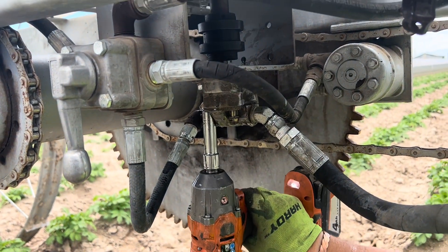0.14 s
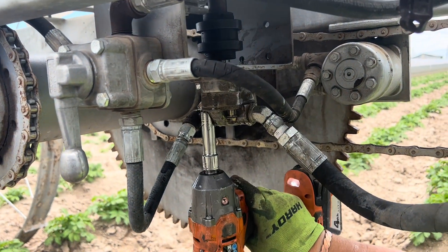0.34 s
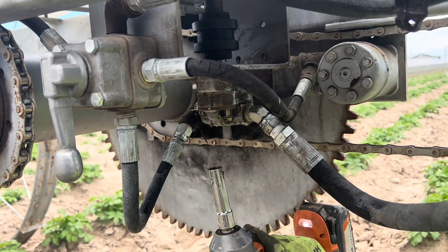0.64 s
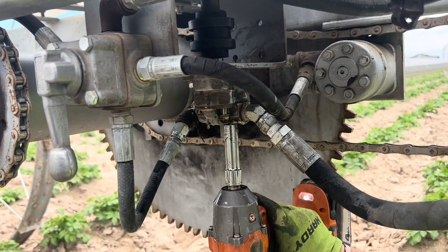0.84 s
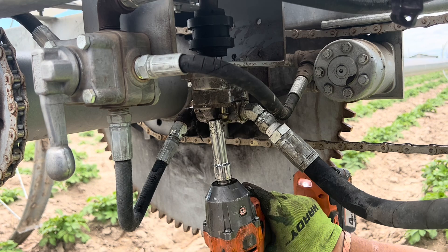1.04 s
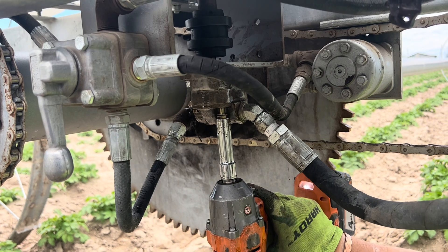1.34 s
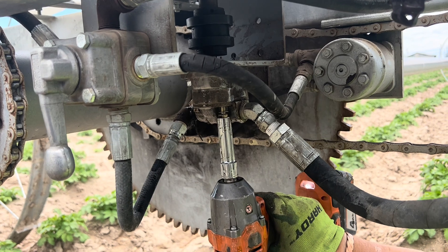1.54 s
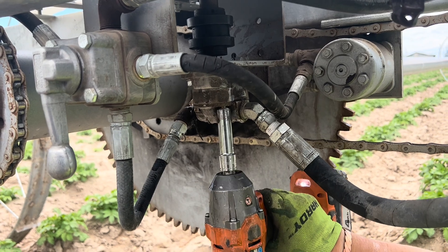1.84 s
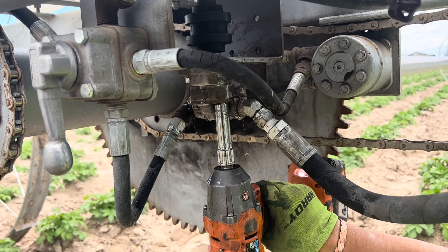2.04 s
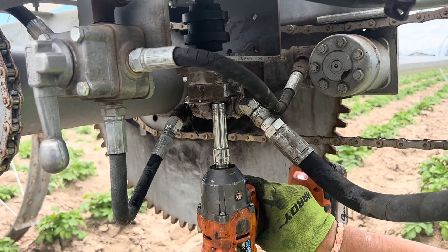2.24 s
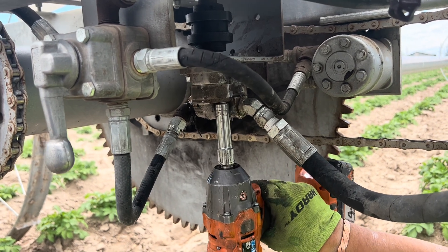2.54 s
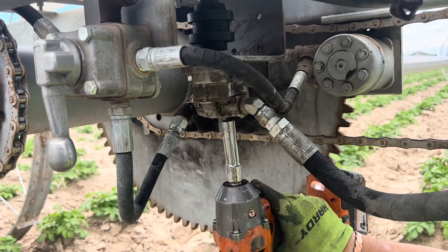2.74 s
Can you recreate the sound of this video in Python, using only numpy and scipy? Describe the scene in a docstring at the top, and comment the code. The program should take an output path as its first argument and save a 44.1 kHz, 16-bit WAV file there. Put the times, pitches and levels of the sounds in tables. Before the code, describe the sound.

A cordless impact wrench gives a short hard rattle, pauses while its socket clicks onto a bolt, then fires three more brief bursts with a rising motor whine; close microphone, open field, faint low rumble.

```python
"""A cordless impact wrench runs four short bursts on the bolts of a farm machine, close by in an open field.
Its motor is a whine with rough gear tones and noise, all following one speed; it slows under load and brakes.
Its hammer strikes the anvil in double blows, made of noisy thuds and cracks with damped rings.
Filtered noise clicks tick inside the tool, and between bursts the socket knocks onto a bolt head.
Noise also makes the soft bumps, the low rumble and the faint outdoor rush underneath."""
import sys
import numpy as np
from scipy import signal
from scipy.fft import rfft, irfft, next_fast_len
from scipy.io import wavfile
from scipy.ndimage import map_coordinates

SR = 44100
rng = np.random.default_rng(int(sys.argv[2]) if len(sys.argv) > 2 else 0)


def put_to_file(sound):
    """Save the sound as 16-bit audio at rate SR, in the file named by the first command-line argument."""
    columns = np.atleast_2d(sound).T  # one column per channel
    safe = np.clip(columns, -1, 1)
    whole_steps = np.round(safe * 32767)
    wavfile.write(sys.argv[1], SR, whole_steps.astype(np.int16))


N = 127890

# The four bursts of the wrench. Each row: motor starts in seconds, hammer bites in seconds,
# time in seconds from which the speed decays, which may lie before the start.
RUNS = [(0.066, .117, 0.41), (1.486, 1.535, 1.4), (1.823, 2.173, 2.255), (2.384, 2.449, 2.54)]


def amp(db):
    """Decibels to gain."""
    return 10 ** (np.asarray(db) / 20)


def rms(x):
    """Root mean square level."""
    return np.sqrt(np.mean(x ** 2))


def unit(x):
    """Scaled to rms 1."""
    return x / np.sqrt(np.mean(x ** 2) + 1e-20)


def along(points, hz):
    """A curve of (Hz, value) points read on a log frequency axis."""
    f, v = np.transpose(points)
    return np.interp(np.log(hz + 1), np.log(f + 1), v)


def level(rows):
    """Gain per sample from (s, dB) points, all but silent outside them."""
    s, db = np.transpose(rows)
    return amp(np.interp(np.arange(N) / SR, s, db, left=-120, right=-120))


def wobble(rate):
    """A smooth random curve with rate knots a second."""
    knots = rng.standard_normal(int(N * rate / SR) + 4)
    return map_coordinates(knots, [np.arange(N) * rate / SR])


def filtered(x, response):
    """x shaped by a response given as a function of frequency."""
    n = x.shape[-1]
    m = next_fast_len(n + 8192)
    hz = np.fft.rfftfreq(m, 1 / SR)
    return irfft(rfft(x, m) * response(hz), m)[..., :n]


def noise(spectrum, size):
    """Coloured noise of rms 1."""
    return unit(filtered(rng.standard_normal(size), lambda hz: amp(along(spectrum, hz))))


def band(centre_hz, width_hz, size):
    """Noise of rms 1 in one resonance."""
    return unit(filtered(rng.standard_normal(size),
                         lambda hz: 1 / (1 + ((hz - centre_hz) / width_hz) ** 2)))


def fade(t, t60):
    """Quick rise and exponential decay of a contact."""
    rise_s = 0.0005
    return (1 - np.exp(-t / rise_s)) * amp(-60 * t / t60)


def burst(spectrum, t, t60):
    """A short noisy contact of set energy, coloured a little differently each time."""
    colour_scatter = 0.086  # relative shift of the spectrum from contact to contact
    shape = fade(t, t60)
    shift = np.exp(colour_scatter * rng.standard_normal())
    shifted = [(hz * shift, db) for hz, db in spectrum]
    return unit(noise(shifted, size=len(t)) * shape) * rms(shape)


def ring(modes, t):
    """Damped modes, struck a little differently each time."""
    scatter_db = 2.5
    out = np.zeros(len(t))
    for hz, db, t60 in modes:
        gain = amp(db + rng.normal(0, scatter_db))
        out += gain * np.sin(2 * np.pi * (hz * t + rng.random())) * fade(t, t60)
    return out


def add(track, s, sound):
    """Mixes a sound in at s seconds."""
    part = track[max(round(s * SR), 0):][:len(sound)]
    part += sound[:len(part)]


def air(air_db=-69):
    """A faint, steady outdoor rush of coloured noise."""
    # Colour of the rush. Each row: frequency in Hz, relative level in dB per Hz.
    air_spectrum = [(100, -9), (850, 14), (2000, 4.5), (2900, -15), (4700, -4), (6300, -15), (15000, -28)]
    return amp(air_db) * noise(air_spectrum, size=N)


def rumble(gust_db=2.25, relative_width=0.46):
    """Low rumble of breeze and handling swells irregularly, with a few soft bumps and rubs."""
    # Course of the rumble, before the gusts. Each row: time in seconds, level in dB.
    rumble_level = [(0, -45), (.45, -43.5), (.62, -50.5), (1.15, -41), (1.42, -59), (1.9, -50), (2.3, -41),
                    (2.9, -44.5)]
    # Colour of the rumble. Each row: frequency in Hz, relative level in dB per Hz.
    rumble_spectrum = [(20, -18), (60, 7), (250, -6.5), (400, -16), (2000, -76)]
    # Bumps and rubs of handling. Each row: middle in seconds, 1/e half-length in seconds,
    # level in dB, centre in Hz.
    bumps = [(0.996, 0.017, -31.5, 80), (1.051, 0.027, -32.5, 180), (1.603, .02, -35, 75),
             (1.699, 0.024, -39, 950), (1.777, 0.021, -32, 220), (2.014, .02, -27, 120),
             (2.587, 0.009, -28.5, 70)]
    t = np.arange(N) / SR
    swell_db = np.interp(t, *np.transpose(rumble_level)) + gust_db * wobble(24)
    out = amp(swell_db) * noise(rumble_spectrum, size=N)
    for s, length, db, hz in bumps:
        shape = np.exp(-((t - s) / length) ** 2)
        out += amp(db) * unit(shape * band(hz, relative_width * hz, size=N)) * rms(shape)
    return out


def knocks(knock_t60=0.015, bolt_db=-19.5, bolt_q=45, scrape_db=-15, scrape_t60=0.18):
    """The socket clicks dryly on the bolt head; the bolt rings roughly as it scrapes into place."""
    # Contacts of socket and bolt. Each row: start in seconds, level in dB, centre of the click in Hz.
    contacts = [(0.8828, -19, 2790), (0.948, -41.5, 3300), (0.97, -46, 7800), (0.991, -34, 1960),
                (1.138, -40.5, 5900), (1.171, -35, 3500), (1.2, -42, 7100), (1.234, -36.5, 2700)]
    # Ring of the bolt and its bracket. Each row: frequency in Hz, relative level in dB, T60 in seconds.
    bolt_modes = [(942, 1, 0.2), (1220, -1, 0.2), (1870, 3, 0.1), (3300, -5.5, .07)]
    t, out = np.arange(SR // 3) / SR, np.zeros(N)
    for s, db, hz in contacts:
        click = band(hz, hz / 2, size=len(t)) * fade(t, knock_t60)
        bolt = np.zeros(len(t))
        for mode_hz, mode_db, t60 in bolt_modes:
            bolt += amp(mode_db) * band(mode_hz, mode_hz / bolt_q, size=len(t)) * fade(t, t60)
        scrape = band(hz / 2, hz, size=len(t)) * fade(t, scrape_t60)
        add(out, s, amp(db) * (click + amp(bolt_db) * bolt + amp(scrape_db) * scrape))
    return out


def ticks(t60=0.02, tick_db=2):
    """Light noise clicks of the trigger and of the gears running down."""
    # Clicks. Each row: start in seconds, level in dB relative to tick_db.
    clicks = [(.2665, -27.5), (1.5128, -36), (1.6423, -24.5), (1.8145, -23.5), (2.2746, -25.5),
              (2.2931, -25.5), (2.3936, -21.5), (2.6403, -26.5), (2.655, -24), (2.6707, -25),
              (2.6883, -24.5), (2.7059, -29), (2.7436, -38.5)]
    # Colour of a click. Each row: frequency in Hz, relative level in dB per Hz.
    tick_spectrum = [(200, -5), (1000, -8.5), (4000, 3.5), (6000, -7.5), (8500, 3), (15500, -16)]
    t, out = np.arange(SR // 10) / SR, np.zeros(N)
    for s, db in clicks:
        add(out, s, amp(db + tick_db) * burst(tick_spectrum, t, t60))
    return out


def hammer(thud_db=4.0, crack_db=6.0):
    """Each blow is a short thud and a steel crack that shake and ring the case, thump the tool and ping the socket."""
    # Hammer blows. Each row: start in seconds, thud in dB relative to thud_db,
    # crack in dB relative to crack_db.
    blows = [(0.1161, -11, -11), (0.1283, -8, -21), (0.1348, -17, -17), (.137, -19.5, -13.5),
             (0.156, -13, -27), (0.1617, -5.5, -18), (.168, -17, -11.5), (.193, -10, -16),
             (0.1997, -19, -11), (.2176, -14.5, -29), (0.2225, -6.5, -16.5), (0.231, -20, -9.5),
             (1.527, -23, -22), (1.5352, -11, -14), (1.5374, -14, -10), (1.5516, -23.5, -18.5),
             (1.566, -21.5, -21), (1.5803, -31.5, -27.5), (1.5939, -14, -8), (1.6112, -30.5, -23.5),
             (1.626, -20, -13), (2.1667, -12.5, -14), (2.1731, -17, -11), (2.1782, -22, -11.5),
             (2.204, -8, -17), (2.2093, -15, -11.5), (2.233, -18, -27.5), (2.2407, -8.5, -16),
             (2.2492, -18.5, -11), (2.45, -20, -13.5), (2.4689, -12.5, -27), (2.474, -11, -7),
             (2.4812, -20, -11.5), (2.5051, -15, -11), (2.512, -17, -12.5), (2.5372, -18, -11.5),
             (2.5422, -14.5, -10), (2.566, -19, -10.5), (2.573, -18, -11), (2.6023, -24.5, -21),
             (2.616, -16.5, -9)]
    # Colours of thud and crack. Each row: frequency in Hz, relative level in dB per Hz.
    thud_spectrum = [(100, -17), (220, -7.5), (600, -15), (1100, 9), (1650, 7), (2600, 3.5), (4000, -9),
                     (15000, -34.5)]
    crack_spectrum = [(1000, -19.5), (4000, 7.5), (6000, 0.5), (8500, 6), (13000, -3.5), (15500, -15.5)]
    # Ring of the hammer case. Each row: frequency in Hz, relative level in dB.
    case_modes = [(1050, -1), (1590, -8), (1785, 6.5), (1875, 3), (3130, -7.5), (3880, 0.5), (6875, -3)]
    # Low thump of the whole tool. Each row: frequency in Hz, level over the thud in dB, T60 in seconds.
    thump = [(214.9, -21.5, 0.13)]
    # Ring of the socket, which sits loose in the second run. Each entry: level over the crack
    # in dB, one per run.
    socket_db = [-29.5, -11, -27.5, -28]
    thud_t60, crack_t60 = 0.01, 0.01
    case_db, case_t60 = -24, .07
    socket_hz, socket_width_hz, socket_t60 = 12660, 250, .028
    shudder_db, shudder_t60 = -18.5, .04  # the tool goes on shaking after each blow
    t, out = np.arange(SR // 5) / SR, np.zeros(N)

    def strike(spectrum, t60):
        """A contact and the weaker, longer shaking after it."""
        return burst(spectrum, t, t60) + amp(shudder_db) * burst(spectrum, t, shudder_t60)

    for s, thud, crack in blows:
        run = sum(s > start for start, _, _ in RUNS) - 1
        case = ring([(hz, db, case_t60) for hz, db in case_modes], t)
        body = strike(thud_spectrum, thud_t60) + amp(case_db) * case + ring(thump, t)
        ping = band(socket_hz, socket_width_hz, size=len(t)) * fade(t, socket_t60)
        steel = strike(crack_spectrum, crack_t60) + amp(socket_db[run]) * ping
        add(out, s, amp(thud + thud_db) * body + amp(crack + crack_db) * steel)
    return out


def motor(free_db=-2, loaded_db=0, whine_db=0.5, choke_db=-10, throb_db=4.5, surge_db=6, surge_s=0.047,
          surge_hz=2700, surge_width_hz=400, grain_db=3.0, waver_db=1.75):
    """The motor surges up and whines; as the hammer bites it sags, flutters and grinds, and its speed decays."""
    # Overall level of motor and gears, one curve per run. Each row: time in seconds, level in dB.
    drives = [
        [(.045, -64), (.075, -45), (.092, -34.5), (.116, -23), (.15, -24.5), (.24, -23.5), (.265, -31),
         (.29, -44.5), (.33, -59)],
        [(1.503, -60), (1.523, -45.5), (1.535, -24), (1.56, -28), (1.62, -35.5), (1.66, -38), (1.70, -61.5),
         (1.73, -69.5)],
        [(1.812, -55), (1.835, -44.5), (1.86, -28), (1.89, -26), (2.13, -25.5), (2.165, -21.5), (2.22, -25.5),
         (2.26, -26.5), (2.29, -36), (2.315, -45.5), (2.385, -64)],
        [(2.387, -49), (2.40, -45), (2.42, -28.5), (2.47, -25), (2.59, -23.5), (2.63, -25.5), (2.66, -39.5),
         (2.70, -46), (2.75, -62)],
    ]
    # Rough gear tones. Each row: multiple of the whine, level relative to the whine in dB before the throb.
    gear_tones = [(.333, -17), (.667, -15), (1.25, -13), (1.346, -7), (2, -21.5)]
    # Colours of the gear noise, free and loaded. Each row: frequency in Hz, relative level in dB per Hz.
    free_spectrum = [(100, -18.5), (300, -2.5), (550, -12), (1000, 6.5), (1500, -6.5), (4500, 5),
                     (5600, -1), (8500, 0), (10500, 1.5), (12000, -10), (15500, -19.5)]
    loaded_spectrum = [(100, -20.5), (210, 7.5), (300, -4), (550, 1.5), (1700, 2), (3900, 2), (5600, -2.5),
                       (7100, -2), (15500, -16.5)]
    top_speed_hz = 2960  # pitch of the main whine at full speed, without load
    spin_up_s, brake_s, bite_s = .031, 0.053, .03  # time constants of run-up, braking, coming load
    sag, flutter, load_flutter = .08, .002, 0.068  # relative slowing and unsteadiness; the last adds from the bite
    hammer_turns = 1 / 70  # hammer revolutions per whine cycle
    churn_db = 1  # swing of the gear noise in each revolution: half of this free, 1.5 times loaded
    t, out = np.arange(N) / SR, np.zeros(N)
    for (start, bite, slowing), drive in zip(RUNS, drives):
        age = np.maximum(t - start, 0)
        load = np.exp(np.minimum(t - bite, 0) / bite_s)  # rises to 1 at the bite and stays

        speed = top_speed_hz * (1 - np.exp(-age / spin_up_s)) * (1 - sag * load)
        speed = speed * np.exp(-np.maximum(t - slowing, 0) / brake_s)
        speed = speed * (1 + flutter * wobble(90) + load_flutter * (t > bite) * wobble(120))
        angle = 2 * np.pi * np.cumsum(speed) / SR
        turn = np.sin(hammer_turns * angle)

        # random phase drift roughens each gear tone
        mesh = sum(amp(db) * np.sin(k * angle + wobble(120)) for k, db in gear_tones)
        tones = np.sqrt(2) * (np.sin(angle) + amp(throb_db * turn) * mesh)
        whine = amp(whine_db + choke_db * load ** 10 + waver_db * wobble(80)) * tones
        whine = whine * speed / top_speed_hz * np.minimum(age / spin_up_s / 1.1, 1) ** 6

        gears = amp(free_db) * np.sqrt(1 - load) * noise(free_spectrum, size=N)
        gears += amp(loaded_db) * np.sqrt(load) * noise(loaded_spectrum, size=N)
        rattle = amp(churn_db * (-0.5 - load) * turn + grain_db * wobble(600))
        surge = amp(surge_db) * np.exp(-(age / surge_s) ** 2) * band(surge_hz, surge_width_hz, size=N)
        out += level(drive) * (gears * rattle + surge + whine)
    return out


def housing(x):
    """The many narrow resonances of the tool and the steel around it ripple its spectrum."""
    ripple_db, spacing_hz = 2.2, 70
    knots = rng.standard_normal(SR // spacing_hz)
    return filtered(x, lambda hz: amp(ripple_db * map_coordinates(knots, [hz / spacing_hz])))


def echo(x, t60s):
    """A diffuse noise tail, decaying at its own rate in each frequency and different at each port."""
    hz, t, z = signal.stft(rng.standard_normal((2, SR)), SR, nperseg=256)
    decay = amp(-60 * t / along(t60s, hz)[:, None])
    tail = signal.istft(z * decay, SR, nperseg=256)[1]
    return signal.fftconvolve(x[None], tail / np.linalg.norm(tail[0]), axes=1)[:, :N]


def spread(x, rate):
    """Two ports whose signals differ slightly from moment to moment."""
    side = amp(-15) * x * wobble(rate)
    return np.array([x + side, x - side])


def scene(field_db=-31):
    """The tool, its scattered echo in the open field, and the background."""
    # Scattered echo. Each row: frequency in Hz, T60 in seconds.
    field_t60 = [(200, .6), (1500, 1), (5000, 0.67), (12000, .25)]
    background = rumble() + air()
    tool = knocks() + ticks() + hammer() + housing(motor())
    near = spread(tool, 200) + spread(background, 40)
    return near + amp(field_db) * housing(echo(tool, field_t60))


def record(dry):
    """The two microphone ports differ in phase and level; nothing is kept above the band limit."""
    # Phase between the ports. Each row: frequency in Hz, lead of left over right in radians.
    port_phase = [(1900, 0.5), (3000, 0.74), (5600, 0.68), (7200, 0.95), (9700, -3), (12400, -5.5),
                  (13400, -8.5), (15500, -8.5)]
    # Balance of the ports. Each row: frequency in Hz, left over right in dB.
    port_balance = [(700, 0.5), (1050, 5), (1500, -2.5), (2700, 1.6), (9000, 0.5)]
    top_hz = 15900
    sides = np.array([[.5], [-.5]])  # each port takes half of the difference

    def port_response(hz):
        """Phase and gain of both ports."""
        return np.exp(1j * sides * along(port_phase, hz)) * amp(sides * along(port_balance, hz))

    ports = filtered(dry, port_response)
    return filtered(ports, lambda hz: hz < top_hz)


dry = scene()
out = record(dry)
put_to_file(out)
```